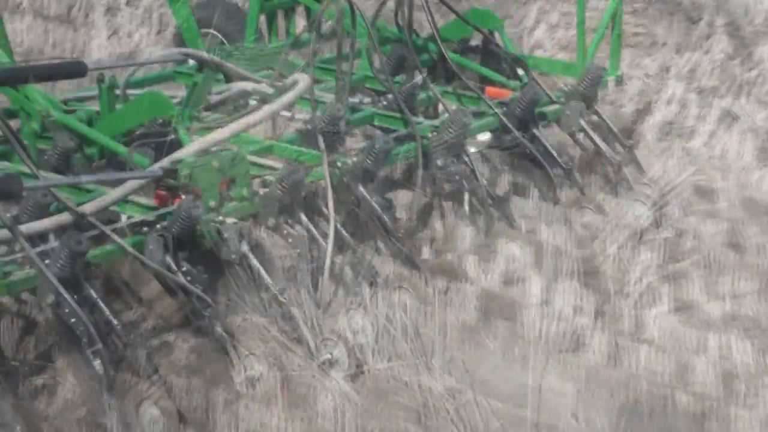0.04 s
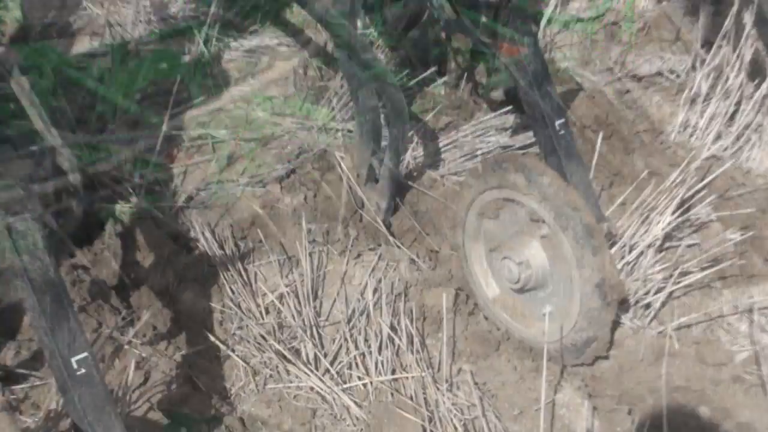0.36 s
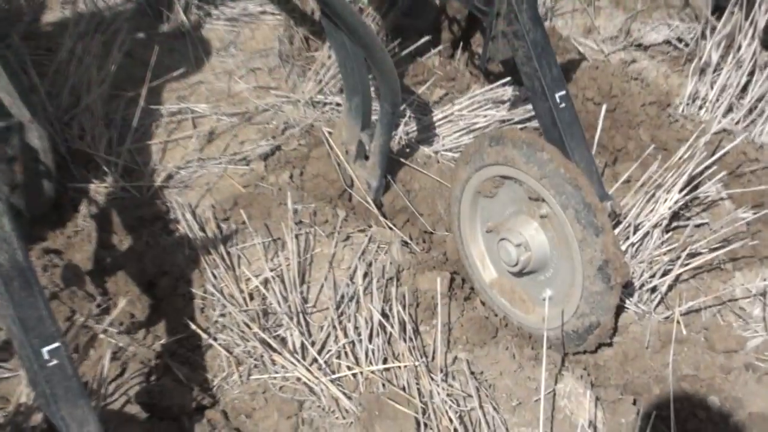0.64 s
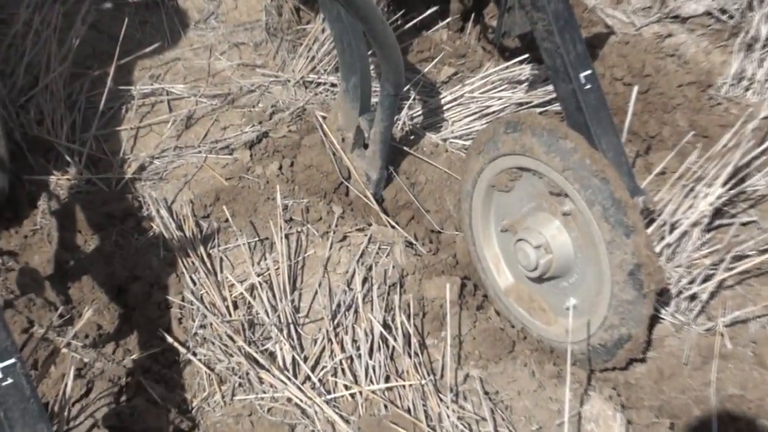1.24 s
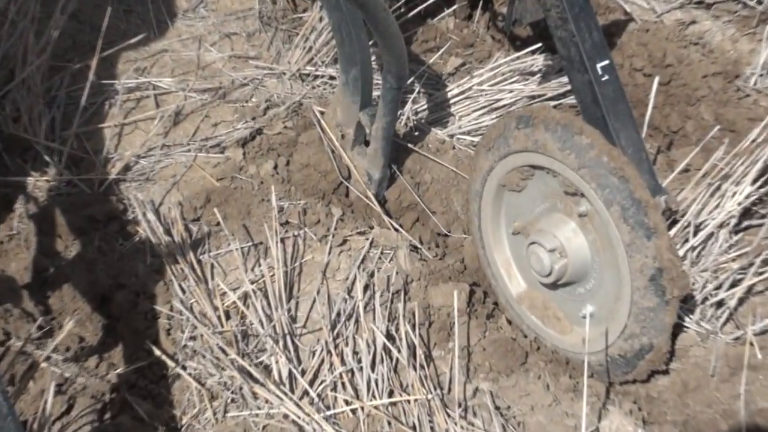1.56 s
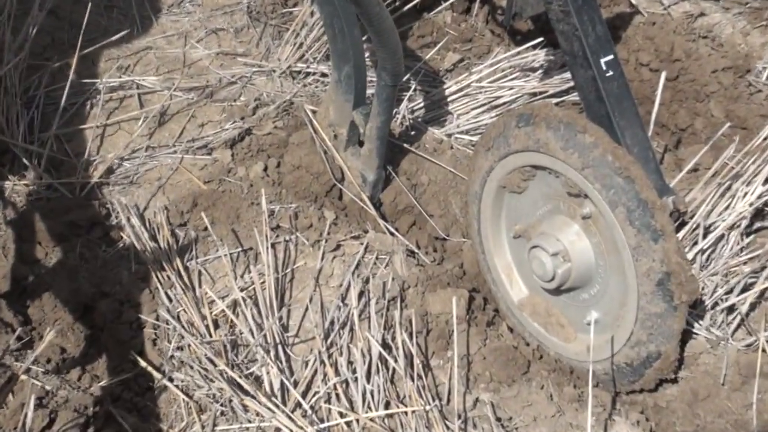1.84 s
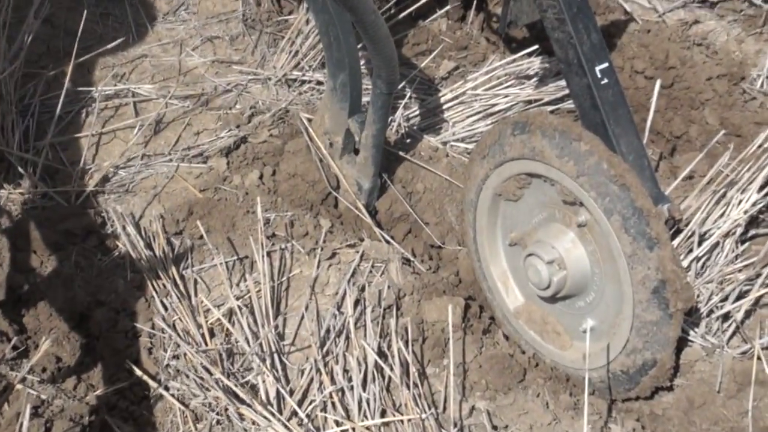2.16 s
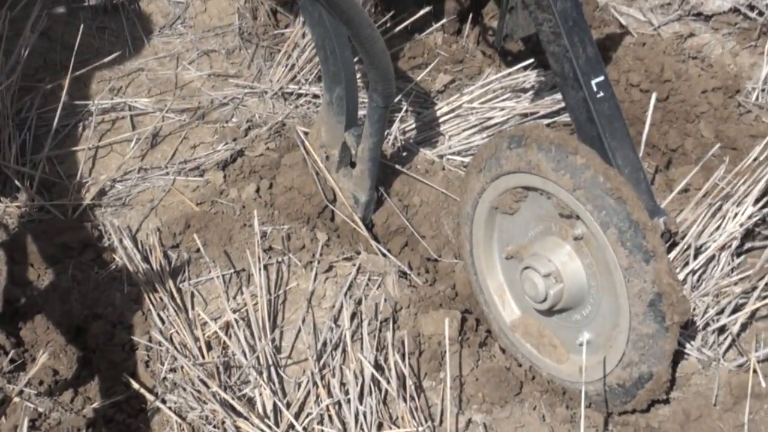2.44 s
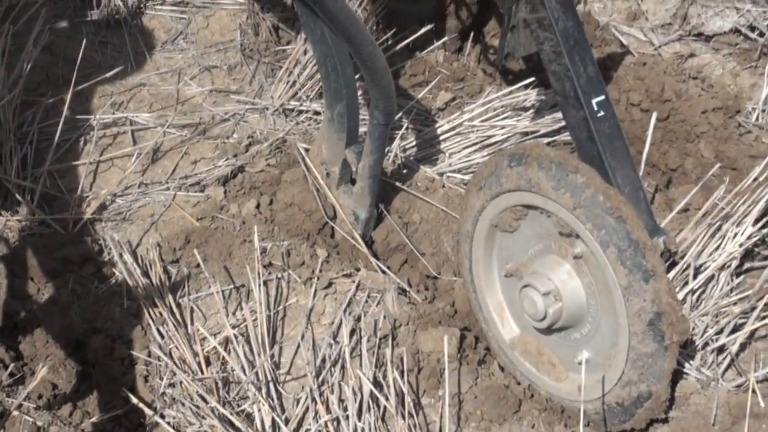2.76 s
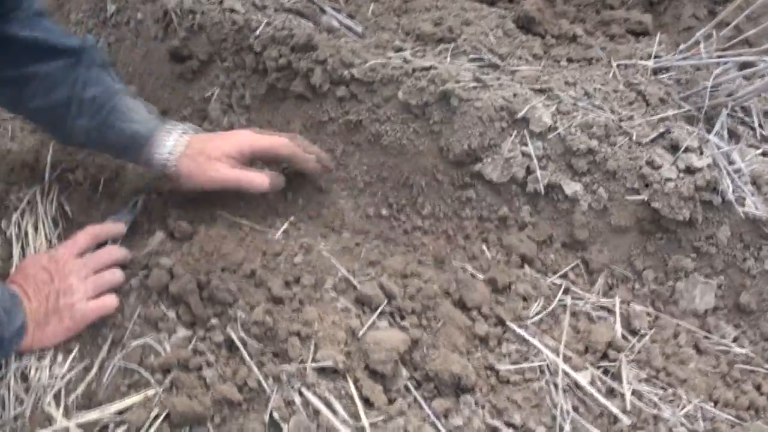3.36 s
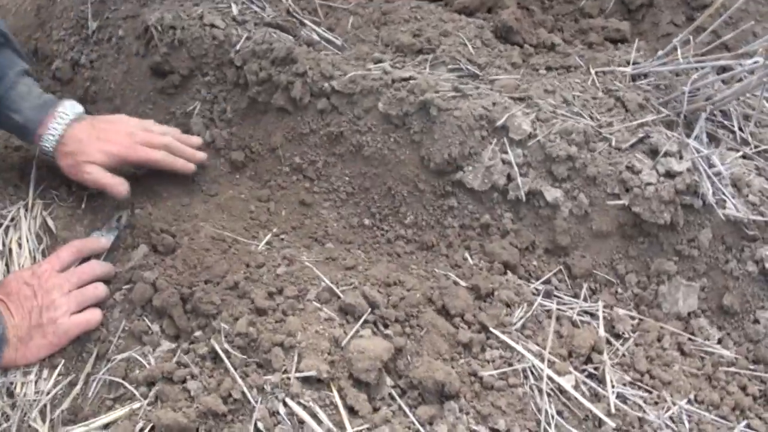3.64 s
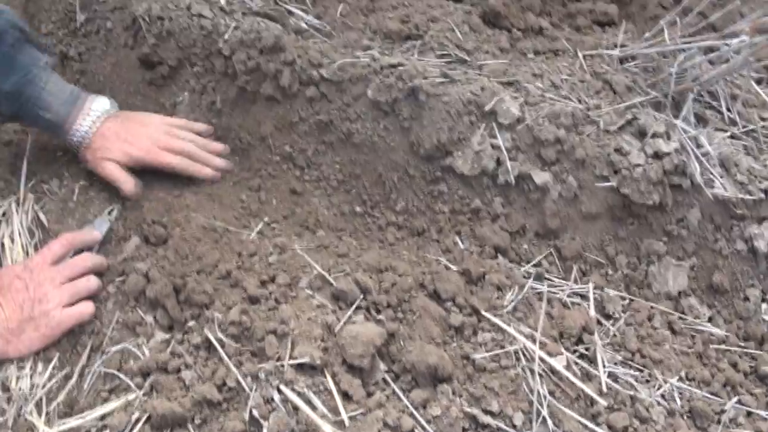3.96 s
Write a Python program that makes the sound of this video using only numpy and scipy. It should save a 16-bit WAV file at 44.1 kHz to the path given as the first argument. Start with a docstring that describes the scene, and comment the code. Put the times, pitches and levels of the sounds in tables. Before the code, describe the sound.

Outdoors on farmland, a tractor engine ticks over steadily, knocking and clattering above a soft exhaust rumble. After about three seconds it suddenly becomes a much louder droning roar, speeding up slightly with a thin, climbing whistle.

```python
"""In an open field, a six-cylinder tractor diesel ticks over. The same uneven knocks come round in
every engine cycle, with clattering metal, a steady gear whine, a low exhaust rumble and one faint scrape.
After about three seconds the sound cuts abruptly to the engine much louder, pulling and gathering speed.
Now the exhaust drones, each firing throws out a burst of roar, and the turbo's whistle rises."""
import sys
import numpy as np
from scipy import signal
from scipy.fft import rfft, irfft
from scipy.io import wavfile
from scipy.ndimage import uniform_filter1d, map_coordinates

SR = 44100
rng = np.random.default_rng(int(sys.argv[2]) if len(sys.argv) > 2 else 0)


def waveform_to_disk(signal):
    """Save audio, clipped to [-1, 1], as 16-bit WAV at the path in sys.argv[1]."""
    frames = np.transpose(np.atleast_2d(signal))
    scaled = np.clip(frames, -1, 1) * 32767
    samples = np.round(scaled).astype(np.int16)
    wavfile.write(sys.argv[1], SR, samples)


N = 176400
CYLINDERS, IDLE_CYCLE_HZ = 6, 8.383  # in one engine cycle, every cylinder fires once


def idling_engine():
    """Knocks, clatter, whine and rumble all follow one slow, almost even engine cycle."""
    cycles = turning(IDLE_CYCLE_HZ * (1 + .001 * walk(9)))
    force, block = knocks(cycles)
    return block + clatter(cycles, force) + gear_whine(cycles) + exhaust_rumble(cycles)


# The knocks of one idle cycle. Each row: place in the cycle from 0 to 1, relative level in dB,
# pitch in Hz, time to swell or die away in seconds.
KNOCKS = [(.015, -3, 637, 0.0024), (.078, 0, 607, .0045), (.15, -0.5, 590, 0.0025), (.225, -2, 622, 0.0028),
          (.33, -.5, 620, 0.0018), (.39, -3, 603, 0.0026), (.465, -.5, 655, 0.0031),
          (.527, -5.5, 620, 0.0047), (.6, -1.5, 585, 0.0044), (.675, -5.5, 650, .0024),
          (.735, -6.5, 628, 0.0038), (.825, -3.5, 627, 0.0018), (.87, -3, 575, 0.0021),
          (.917, -5, 644, 0.0034)]

def knocks(cycles):
    """Each knock briefly rings the engine block at a sagging pitch. Returns the force and the sound."""
    jitter_s, scatter_db, sag_hz_per_s = .00018, 1.5, 21000
    force, sound = 0, 0
    for place, db, hz, length_s in KNOCKS:
        position = cycles - place + 1.5  # the knock peaks halfway between whole numbers
        chance = rng.standard_normal((int(cycles[-1]) + 3, 2))[position.astype(int)]  # new each cycle
        from_peak_s = (position % 1 - .5) / IDLE_CYCLE_HZ + jitter_s * chance[:, 0]
        blow = undb(db + scatter_db * chance[:, 1]) * np.exp(-(from_peak_s / length_s) ** 2)
        turns = hz * from_peak_s - sag_hz_per_s * from_peak_s ** 2 / 2 + rng.random()
        force += blow
        sound += blow * np.sin(2 * np.pi * turns)
    return force, level(sound, -43.5)


# The tone colour of the clatter. Each row: frequency in Hz, relative level in dB.
CLATTER_COLOUR = [(60, -32), (200, -7), (310, -2), (410, -7.5), (600, -3), (850, -2.5), (1200, 0.5),
                  (1500, -3.5), (1760, -5), (2050, -7.5), (2500, -9), (2900, -12.5), (3300, -13),
                  (4000, -17), (5100, -16), (7000, -21.5), (9300, -28.5), (11000, -32), (13500, -47)]
# The thin rings of the engine covers. Each row: pitch in Hz, rough width in Hz, level in dB.
COVER_RINGS = [(1745, 83, -60), (2530, 47, -68.5), (3260, 150, -67), (10060, 90, -78.5)]

def clatter(cycles, knock_force):
    """The valve gear clatters, harder at each firing and knock, and sets the covers ringing."""
    pulses = 1 + .35 * np.exp(-(cycles * CYLINDERS % 1) / .24) + .13 * knock_force
    shaking = pulses * rattle(cycles, fresh_db=-.5) * undb(.28 * walk(5.1))
    return level(colour(shaking, CLATTER_COLOUR), -43.5) + ringing_metal(shaking, COVER_RINGS)


# The speed of the pulling engine. Each row: time in seconds, firings per second.
FIRING_RATE = [(2.97, 69.7), (3.12, 70.2), (3.2, 72.5), (3.29, 74.4), (3.4, 74.8), (3.5, 74.9),
               (3.62, 76.6), (3.75, 77.5), (3.88, 78.7), (4, 79.1)]
# How load changes the roar and the shaft and gear tones. Each row: time in seconds, gain in dB.
LOAD_GAIN = [(2.97, -1.5), (3.14, -2.5), (3.22, -0.5), (3.45, 0), (3.52, -1), (3.65, .5), (4, 0)]
# A hum at four times the firing rate. Each row: time in seconds, level in dB.
HUM_LEVEL = [(2.97, -38), (3.13, -48), (3.22, -35), (3.4, -34.5), (3.56, -35), (3.68, -48), (4, -42)]
# The shaft and gear tones. Each entry: vibrations per engine cycle.
SHAFT_ORDERS = [12, 16, 18, 22, 33, 45, 48, 57, 64, 66, 75, 81, 96, 136]
# The strength of those same tones. Each entry: level in dB before the load gain.
SHAFT_DB = [-47, -45, -45, -45, -47, -46, -46, -46, -44, -45, -45, -47, -49, -49]

def working_engine():
    """The exhaust drones at the firing rate, under a hum, a roar and fluttering shaft and gear tones."""
    firings = turning(curve(FIRING_RATE) * (1 + .001 * walk(15)))
    cycles = firings / CYLINDERS
    drone = engine_tone(cycles, CYLINDERS) * undb(-32.5 + .5 * walk(16))
    shafts = sum(level(engine_tone(cycles, order) * undb(3.5 * walk(9.7)), db)
                 for order, db in zip(SHAFT_ORDERS, SHAFT_DB))
    hum = engine_tone(cycles, 4 * CYLINDERS) * undb(curve(HUM_LEVEL))
    return drone + hum + (roar(firings) + shafts) * undb(curve(LOAD_GAIN) + .35 * walk(20))


# The tone colour of the roar. Each row: frequency in Hz, relative level in dB.
ROAR_COLOUR = [(20, -16), (60, -9), (120, -5.5), (190, 0.5), (250, 2.5), (340, -2), (580, -0.5), (850, -1),
               (1180, -3), (1400, -5), (2200, -6.5), (2900, -9), (3800, -9), (4400, -13), (7000, -13),
               (8200, -15), (10500, -18.5), (12500, -24), (15000, -35)]
# The rings of pipe and panels. Each row: pitch in Hz, rough width in Hz, level in dB before the load gain.
PANEL_RINGS = [(1670, 89, -48), (3284, 170, -48.5)]

def roar(firings):
    """Each firing throws a burst of noise into the pipe and panels."""
    pulses = 1 + .47 * np.exp(-(firings % 1) / .3)
    bursts = pulses * rattle(firings / CYLINDERS, fresh_db=-5)
    return level(colour(bursts, ROAR_COLOUR), -28) + ringing_metal(bursts, PANEL_RINGS)


# The turbo's whistle. Each row: time in seconds, pitch in Hz, level in dB.
TURBO_WHISTLE = [(2.98, 8995, -30), (3.11, 9050, -28), (3.2, 9135, -32), (3.32, 9230, -35),
                 (3.45, 9365, -35), (3.58, 9520, -35), (3.68, 9600, -43), (3.82, 9640, -38), (4, 9630, -45)]

def turbo():
    """Spinning blades make a fluttering tone inside a band of rushing air that climbs with it."""
    wander_hz, flutter_db, rush_width_hz = 8, 2, 800
    angle = 2 * np.pi * turning(curve(TURBO_WHISTLE) + wander_hz * walk(120))
    blades = level(np.sin(angle) * undb(flutter_db * walk(45.1)), 0)
    air = noise() + 1j * noise()
    for cutoff_hz in (rush_width_hz / 2, rush_width_hz):
        air = signal.sosfilt(signal.butter(1, cutoff_hz, fs=SR, output="sos"), air)
    rush = np.real(air * np.exp(1j * angle))  # moves the low noise up around the whistle
    return blades * undb(curve(TURBO_WHISTLE, column=2)) + level(rush, -36) * undb(walk(17))


def gear_whine(cycles):
    """A gear whines steadily at idle, vibrating 120 times per engine cycle."""
    return level(np.sin(2 * np.pi * 120 * cycles) * undb(.5 * walk(17)), -46.5)


# The tone colour of the rumble. Each row: frequency in Hz, relative level in dB.
RUMBLE_COLOUR = [(20, -36), (35, -16), (55, -12), (82, 0.5), (105, -4), (145, -3.5), (220, -11.5),
                 (420, -21.5), (1500, -39)]
# The slow rise and fall of the rumble. Each row: time in seconds, gain in dB.
RUMBLE_GAIN = [(0, 0), (.7, -1), (1.2, -2), (1.42, 1), (1.68, -1.5), (1.9, 0.5), (2.95, -0.5)]

def exhaust_rumble(cycles):
    """The idling exhaust makes a low, gently swelling noise that is mostly new in each cycle."""
    rumble = colour(rattle(cycles, fresh_db=8.5), RUMBLE_COLOUR) * undb(walk(12))
    return level(rumble, -48) * undb(curve(RUMBLE_GAIN))


def scrape():
    """One short, faint, high scrape."""
    t = np.arange(N) / SR
    peak_s, length_s = 1.163, .013
    return level(ring(noise(), hz=5000, width_hz=500), -53) * np.exp(-((t - peak_s) / length_s) ** 2)


def rattle(cycles, fresh_db):
    """Metal parts rattle alike in every cycle. More fresh_db mixes in more new noise, as does the treble."""
    repeat_below_hz = 2360
    size = int(N / cycles[-1] / 2)
    one_cycle = level(irfft(np.exp(2j * np.pi * rng.random(size + 1))), 0)
    repeating = map_coordinates(one_cycle, [cycles % 1 * len(one_cycle)], mode="grid-wrap")
    repeat_share = 1 / (1 + undb(2 * fresh_db) + (np.fft.rfftfreq(N, 1 / SR) / repeat_below_hz) ** 2)
    return irfft(rfft(repeating) * np.sqrt(repeat_share) + rfft(noise()) * np.sqrt(1 - repeat_share), N)


def ringing_metal(shaking, rings):
    """Shaken metal rings at its own few pitches."""
    return sum(level(ring(ring(shaking, hz, 2 * width), hz, 2 * width), db) for hz, width, db in rings)


def engine_tone(cycles, order):
    """A pure tone that vibrates `order` times per engine cycle."""
    return level(np.sin(2 * np.pi * (order * cycles + rng.random())), 0)


def spread(x, width, lean):
    """Sound scattered by soil and machine arrives differently on the left and right."""
    echo_samples = SR // 40
    scatter = rfft(rng.standard_normal(echo_samples) * np.hanning(echo_samples), N)
    middle = rfft(x)
    side = middle * gains(width) * scatter / np.abs(scatter)
    tilt = np.sqrt(gains(lean))
    return irfft(np.array([(middle + side) * tilt, (middle - side) / tilt]), N)


def undb(db):
    """Turn decibels into a gain."""
    return 10 ** (np.asarray(db) / 20)


def level(x, db):
    """Scale a sound to an average (rms) level."""
    return x * undb(db) / np.sqrt(np.mean(x ** 2))


def curve(rows, column=1):
    """One column of a table, joined by straight lines in time."""
    rows = np.array(rows)
    return np.interp(np.arange(N) / SR, rows[:, 0], rows[:, column])


def noise():
    """White noise, an even hiss."""
    return rng.standard_normal(N)


def walk(rate_hz):
    """A smooth random wobble with a typical size of 1."""
    hold = max(int(SR / rate_hz), 1)
    steps = np.repeat(rng.standard_normal(N // hold + 1), hold)
    return level(uniform_filter1d(uniform_filter1d(steps, hold), hold)[:N], 0)


def gains(points):
    """The gain at every frequency, from rows of Hz and dB."""
    hz, db = np.array(points).T
    return undb(np.interp(np.log(np.fft.rfftfreq(N, 1 / SR) + 1), np.log(hz), db))


def colour(x, points):
    """Shape a sound's bass and treble by rows of Hz and dB."""
    return irfft(rfft(x) * gains(points), N)


def ring(x, hz, width_hz):
    """Keep a narrow band around one pitch."""
    return signal.lfilter(*signal.iirpeak(hz, hz / width_hz, fs=SR), x)


def lowpass(x, hz):
    """Steeply cut everything above this frequency."""
    return signal.sosfilt(signal.ellip(10, .1, 80, hz, fs=SR, output="sos"), x)


def turning(hz):
    """Count the turns made so far at this rate."""
    return np.cumsum(hz) / SR


# How wide the idling and working engine sound. Each row: frequency in Hz, side minus middle in dB.
IDLE_WIDTH = [(60, -34), (120, -35), (250, -23), (400, -17), (600, -22), (750, -17), (900, -8), (1010, -17),
              (1250, -13), (1600, -6), (2500, -9), (5000, -11), (10000, -9), (13000, -5)]
WORK_WIDTH = [(60, -29), (260, -26), (460, -11.5), (800, -18), (950, -12.5), (1200, -22.5), (1450, -11),
              (2100, -26.5), (4000, -20), (5500, -13), (8200, -12), (9200, -17.5), (12000, 0)]
# Which way each one leans. Each row: frequency in Hz, left minus right in dB.
IDLE_LEAN = [(400, 0), (650, 1.7), (880, -.8), (1010, 3.4), (1400, .8), (3000, 1), (5000, .3)]
WORK_LEAN = [(60, -1.2), (220, -.3), (430, -2.5), (620, .5), (950, -.7), (2000, 0), (9800, 0), (12000, 5)]

def scene():
    """The idle stops short, and after a tiny gap the working engine comes in."""
    t = np.arange(N) / SR
    cut_s, gap_s, fade_in_s = 2.967, .00517, .014
    idle = lowpass(spread(idling_engine() + scrape(), IDLE_WIDTH, IDLE_LEAN), hz=13350)
    work = spread(working_engine() + turbo(), WORK_WIDTH, WORK_LEAN)
    fade_out = np.clip((cut_s - t) / gap_s, 0, 1)
    fade_in = np.clip((t - cut_s - gap_s) / fade_in_s, 0, 1)
    return idle * fade_out + work * fade_in


def record(dry):
    """Take away the very highest treble."""
    return lowpass(dry, hz=15000)


dry = scene()
out = record(dry)
waveform_to_disk(out)
```